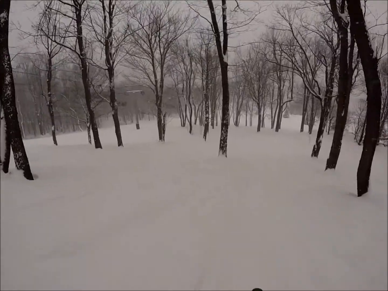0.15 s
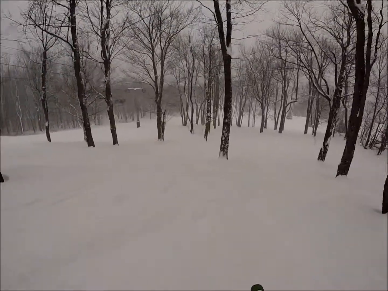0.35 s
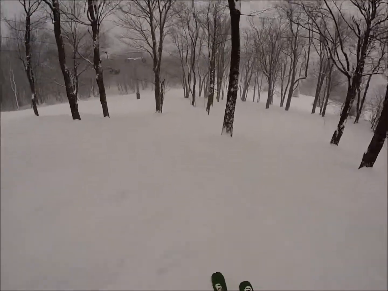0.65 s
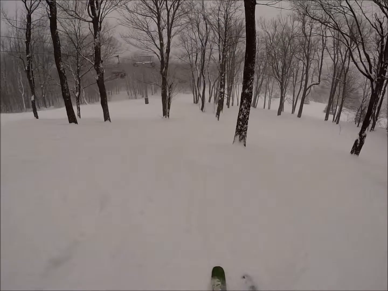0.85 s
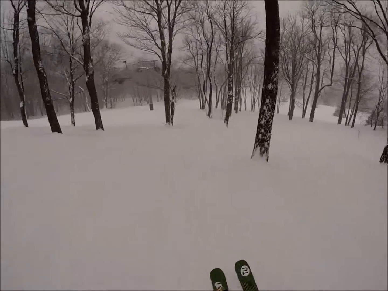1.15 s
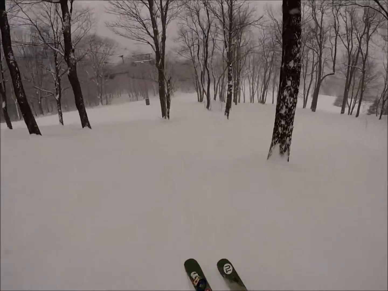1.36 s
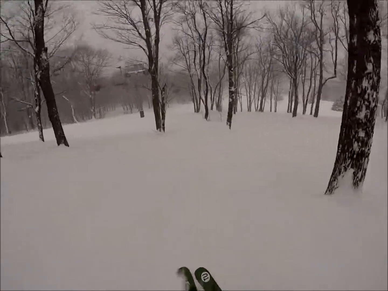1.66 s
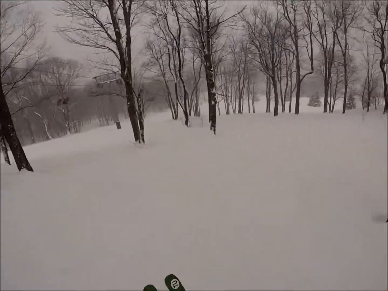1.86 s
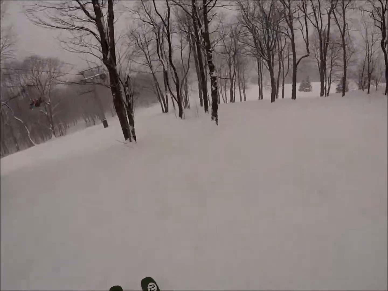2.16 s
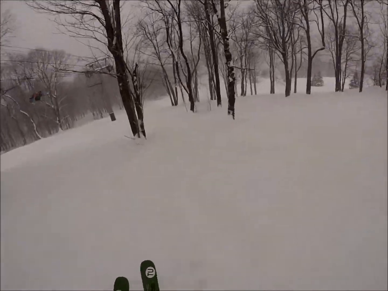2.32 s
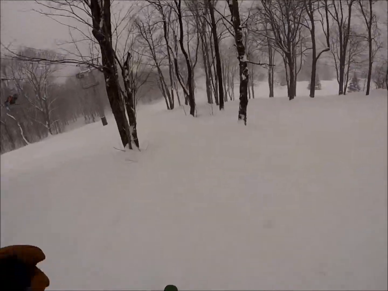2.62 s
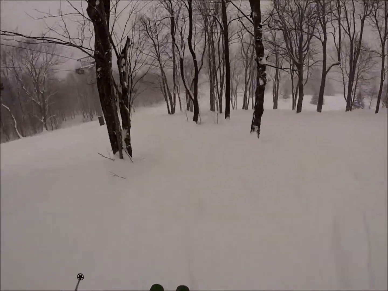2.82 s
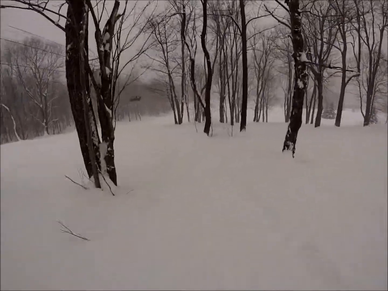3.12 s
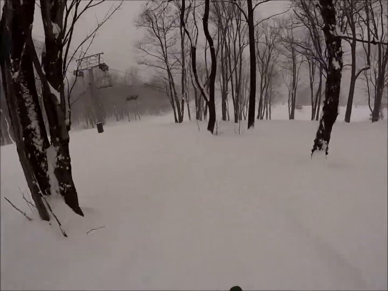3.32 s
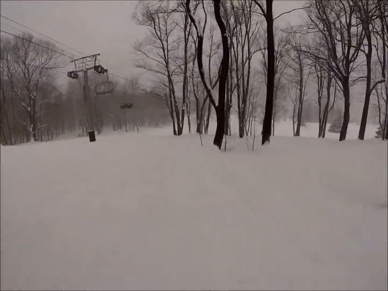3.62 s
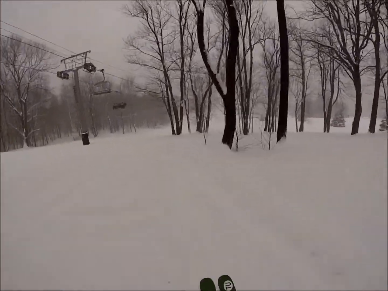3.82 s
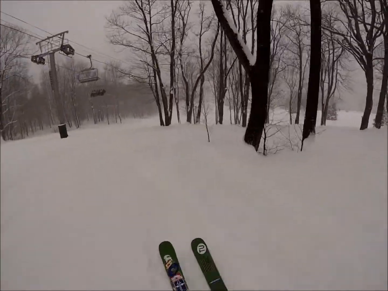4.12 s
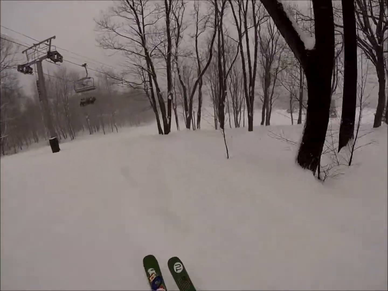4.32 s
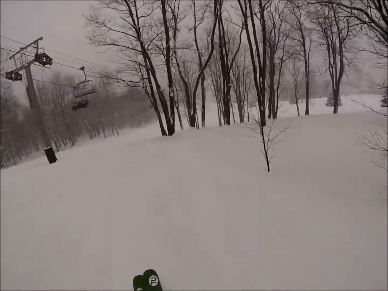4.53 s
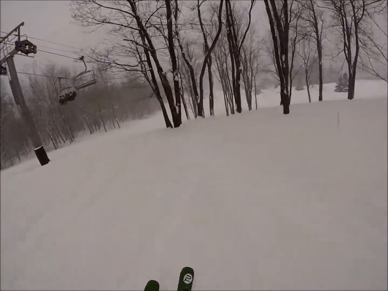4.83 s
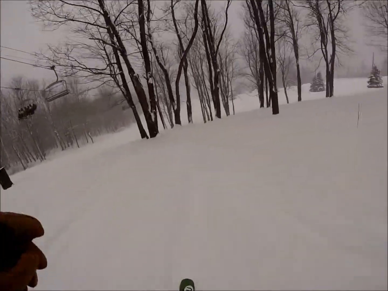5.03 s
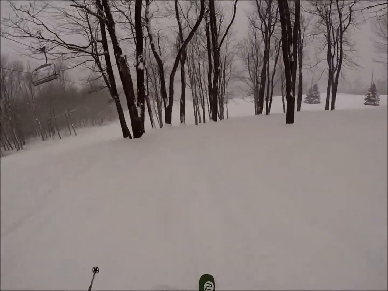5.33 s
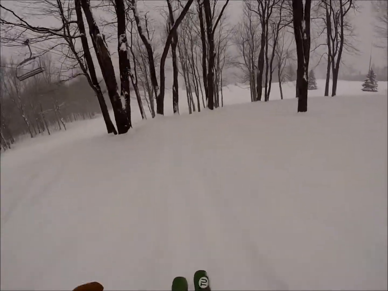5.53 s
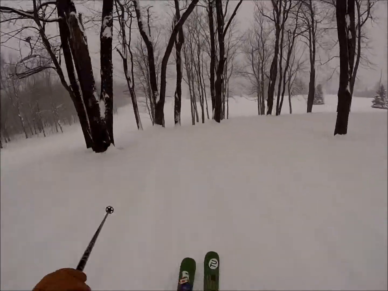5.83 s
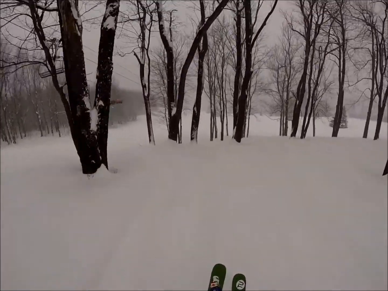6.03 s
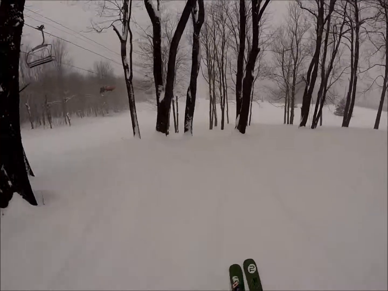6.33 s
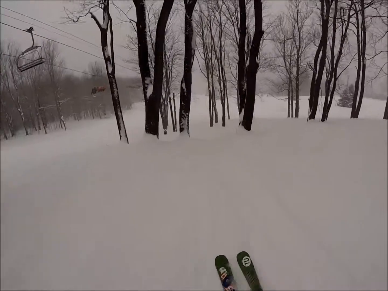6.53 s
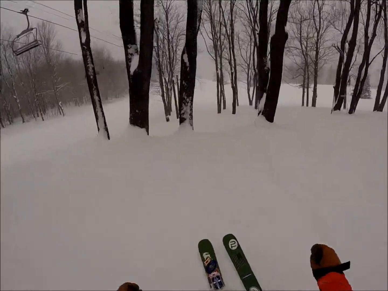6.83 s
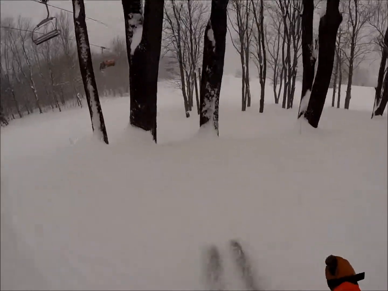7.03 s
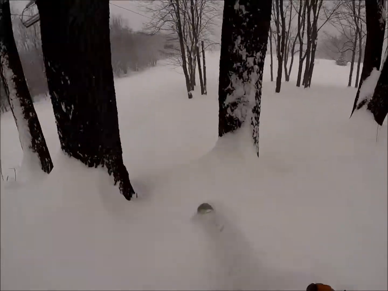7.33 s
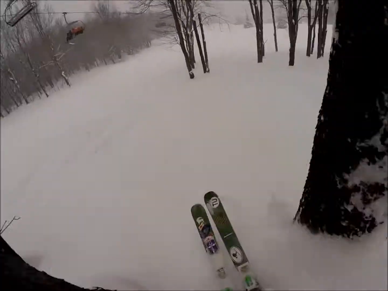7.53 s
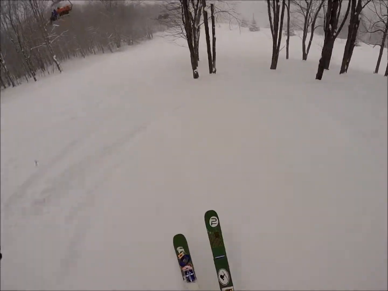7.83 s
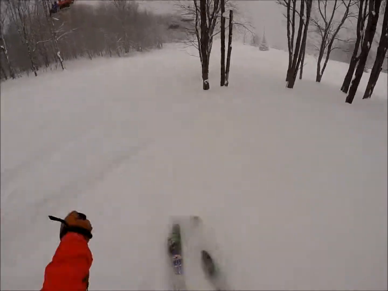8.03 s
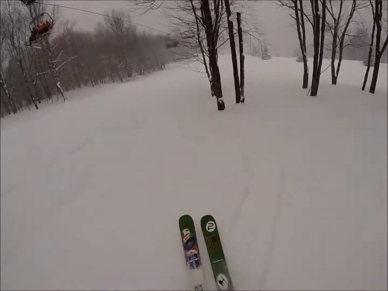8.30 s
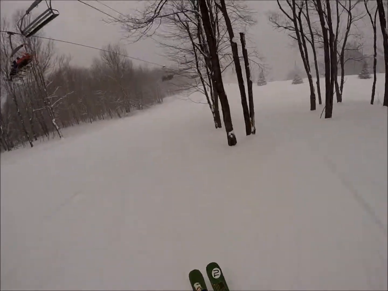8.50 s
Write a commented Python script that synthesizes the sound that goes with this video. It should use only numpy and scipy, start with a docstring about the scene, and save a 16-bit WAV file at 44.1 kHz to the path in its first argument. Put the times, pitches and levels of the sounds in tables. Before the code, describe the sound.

Heard from a camera in a plastic housing worn by a skier among trees. It begins quietly, then skis hiss and flutter through deep powder. Fine spray fizzes and crunches, and icy grains tick sharply against the casing. Dull soft thuds mark bumps. Low wind rumbles in lumps, and after a sudden brief thinning of the spray near the end, the skis and rushing air grow strongest.

```python
"""Deep powder between trees: skis run through it, heard from a camera in a plastic housing on the skier.
The snow hisses under the skis as shaped noise, with dull thuds at soft bumps. Spray is noise and
random short crunches; larger grains tick on the housing as single blows through its ring.
The headwind is low noise in slow pushes and lumps, hardest in a fast stretch near the end."""
import sys
import numpy as np
from scipy import signal
from scipy.fft import rfft, irfft
from scipy.io import wavfile
from scipy.ndimage import uniform_filter1d

SR = 44100
rng = np.random.default_rng(int(sys.argv[2]) if len(sys.argv) > 2 else 0)


def file_out(sig):
    """Save sig as 16-bit WAV at sys.argv[1]."""
    # one column per channel
    cols = np.atleast_2d(sig).T
    # limit, then scale
    lim = np.clip(cols, -1, 1)
    pcm = np.round(lim * 32767).astype(np.int16)
    wavfile.write(sys.argv[1], SR, pcm)


N = 381906  # samples, about 8.7 s
TOP_HZ = 15400  # top of the camera's treble

# How hard the skis work the snow, turn by turn; also sets the level of the heavier grains
# in the spray: start_s, effort_db
EFFORT = [(0.0, -51.5), (0.14, -53), (0.31, -44), (0.43, -49.5), (0.53, -54), (0.63, -42), (.72, -39.5),
          (.9, -37.5), (1.4, -34.5), (1.7, -36), (2.17, -35.5), (2.26, -39), (2.6, -37.5), (2.95, -38.5),
          (3.3, -35), (3.5, -33), (3.61, -38.5), (3.69, -32), (4.18, -33.5), (4.33, -37.5), (4.45, -35.5),
          (4.72, -34.5), (4.92, -37.5), (5.2, -39.5), (5.4, -38.5), (6.05, -40), (6.27, -34), (6.48, -36),
          (6.58, -40), (6.8, -32), (7.32, -29.5), (7.47, -34), (7.56, -38.5), (7.64, -34), (7.98, -29.5),
          (8.38, -36), (8.49, -31), (8.66, -32)]
# Low rub of the ski bases against the hiss, before the mix trim: start_s, level_db
RUB_LEVEL = [(0, -12.5), (.4, -18), (1.35, -15.5), (2.5, -6.5), (3.4, -8), (4.0, -12), (4.4, -9),
             (5.7, -8.5), (6.2, -15.5), (8.66, -16)]
# Spectrum of snow shearing under the skis: pitch_hz, level_db
HISS_SPECTRUM = [(350, -19), (750, -19), (1250, -10.5), (1450, -2.5), (1580, 3), (1900, 1.5), (2060, 2.5),
                 (2550, 1), (2950, -13), (3200, -8.5), (3700, -21.5), (5500, -14), (8000, -33),
                 (15000, -71)]
# Spectrum of the rubbing ski bases: pitch_hz, level_db
RUB_SPECTRUM = [(200, -12), (450, -19), (760, -19.5), (900, -2), (1000, 1), (1100, 3), (1220, -14.5),
                (1600, -40)]


def skis():
    """Countless crystals shear under the skis; the uneven snow makes the hiss flutter."""
    effort = undb(curve(EFFORT))
    rub_level = effort * undb(curve(RUB_LEVEL))
    hiss = undb(0.42) * effort * noise(HISS_SPECTRUM)
    rub = undb(-1.5) * rub_level * noise(RUB_SPECTRUM)
    flutter = undb(1.1 * walk(rate=45))
    return (hiss + rub) * flutter


# Soft bumps that the skis press through: peak_s, level_db, half_s (half length)
BUMPS = [(.44, -46.5, 0.054), (1, -40, 0.056), (2.19, -41.5, 0.053), (3.05, -40.5, .04), (3.65, -36, 0.071),
         (4.103, -38, .06), (4.902, -40.5, 0.041), (5.213, -34.5, 0.042), (6.19, -39.5, 0.049),
         (6.726, -37, 0.045), (8.14, -34, 0.05), (8.358, -35, 0.064), (8.586, -34, 0.058)]
# Spectrum of packing snow: pitch_hz, level_db
THUD_SPECTRUM = [(50, -17), (95, 7), (135, -2), (175, -14.5), (260, -18.5), (500, -34.5)]


def bumps():
    """Dull thuds that swell and fade as the skis pack the snow of a bump."""
    level = sum(undb(db) * swell(s, half_s) for s, db, half_s in BUMPS)
    return level * eddies(THUD_SPECTRUM, size=SR // 12)


# Fine snow hanging in the air, before the trim of each layer: start_s, level_db
FINE_SNOW = [(0, -55), (.9, -53.5), (1.5, -49.5), (3.0, -48.5), (4.5, -48.5), (5.5, -50.5), (6.3, -49.5),
             (7.3, -50.5), (8.66, -49)]
# Clouds of snow thrown up at the housing: peak_s, rise_db, half_s (half length)
FLURRIES = [(.42, 2, .06), (.65, 1.5, .04), (1.04, 2, .04), (1.75, 2, .2), (2.85, 4, .12), (3.42, 2.5, .12),
            (3.8, 2, .07), (4.2, 2, .08), (5.15, 2, .3), (5.62, 2.5, 0.04004)]
# The skis go light and the spray thins: peak_s, dip_db, half_s (half length)
LULLS = [(.16, -5.5, .035), (.53, -2.5, .035), (2.24, -4, .035), (3.61, -8, .045), (5.87, -3.5, .09),
         (7.585, -13, .062)]
# Spectrum of the hissing powder: pitch_hz, level_db
POWDER_SPECTRUM = [(2000, -10), (4400, -3), (5400, 3), (6800, 2), (7900, -3), (9800, -2), (12300, -7),
                   (15300, -13)]
# Spectrum that fine crystals ring with: pitch_hz, level_db
CRYSTAL_SPECTRUM = [(1000, -5.5), (3000, 3), (4400, 6.5), (5200, 0), (6500, 5), (7900, -4.5), (9400, 0.5),
                    (10700, -3), (11800, -3), (13600, -9), (15000, -10.5)]
# Ring of the housing under heavier grains: pitch_hz, level_db
GRAIN_SPECTRUM = [(500, -9), (1100, 4.5), (2200, 3), (2900, 4), (3200, 7.5), (3700, -2), (4500, -0.5),
                  (4850, 6.5), (5000, 2.5), (5250, 8.5), (5800, 1), (6600, -5.5), (7300, -2), (15000, -4.5)]


def spray():
    """Snow flies in flurries: powder hisses, fine crystals fizz, grains that grow with effort tick."""
    cruise_db = -36
    above_cruise_db = curve(EFFORT) - cruise_db
    fine = undb(curve(FINE_SNOW))
    # heavier grains gain 0.42 dB per dB of effort; their base level is before the mix trim
    heavy = undb(-43.5 + 0.42 * above_cruise_db)
    clouds_db = swells(FLURRIES) + swells(LULLS)
    flurry = undb(clouds_db + 1.6 * walk(rate=45))
    powder = undb(-6) * fine * flurry * noise(POWDER_SPECTRUM)
    crystals = impacts(fine * flurry, rate=950, spread_db=8.0, largest=2.63,
                       pitch_hz=10440, scatter=0.308, decay_cycles=3.4, ragged=0.15)
    grains = impacts(heavy * flurry, rate=230, spread_db=7.0, largest=1.5,
                     pitch_hz=4950, scatter=0.15, decay_cycles=1.2, ragged=0.056)
    fizz = undb(3) * colour(crystals, CRYSTAL_SPECTRUM)
    ticks = undb(-2.5) * colour(grains, GRAIN_SPECTRUM)
    return powder + fizz + ticks


def impacts(flow, rate, spread_db, largest, pitch_hz, scatter, decay_cycles, ragged, size=64):
    """Grains of rms `flow`, each a brief crunch at its own pitch; sizes stop at `largest` deviations."""
    # more snow means mostly more grains, and somewhat louder ones
    density = (flow / flow.mean()) ** .95
    at = np.flatnonzero(rng.random(N) < rate * density / SR)  # rate in grains per second
    chance = rng.standard_normal((len(at), size + 3))
    weight, pitch, phase = chance.T[:3, :, None]
    grain_hz = np.minimum(pitch_hz * np.exp(scatter * pitch), TOP_HZ)
    cycles = grain_hz * np.arange(size) / SR
    # a grain crumbles unevenly, so each has its own ragged colour
    crumble = ragged * np.cumsum(chance[:, 3:], axis=1)
    crunch = np.exp(-cycles / decay_cycles) * np.sin(2 * np.pi * (cycles + phase + crumble))
    crunch /= np.linalg.norm(crunch, axis=1, keepdims=True)
    crunch *= undb(spread_db * np.minimum(weight, largest))
    samples = at[:, None] + np.arange(size)
    x = np.bincount(samples.ravel(), crunch.ravel(), N + size)[:N]
    x = x / np.sqrt(density)
    return flow * x / x.std()


# Larger icy grains striking the housing, levels before the trim of each part:
# start_s (just before the blow), tick_db, knock_db (against the tick), splinter_db (against the tick)
PELLETS = [(0.243, -25.5, -22, -30), (0.3025, -39, 12, -15), (0.329, -25, -18, -21), (0.348, -26, -16, -8),
           (0.397, -28, -14, -11), (0.5332, -30, -16, -16), (0.5906, -34, 6, -16), (0.608, -29, -11, -13),
           (0.635, -15.5, -23, -30), (0.6484, -15.5, -24, -18), (0.8748, -12, -26, -29),
           (0.9971, -21, -16, -25), (1.0526, -25.5, -12, -4), (1.2107, -21, -18, -15),
           (1.3773, -18, -14, -15), (1.4453, -19, 3.5, -13), (1.7561, -17, -12, -21),
           (1.817, -20.5, -5, -16), (1.869, -19.5, -16, -24), (2.047, -18, -16, -25),
           (2.336, -12.5, -20, -18), (2.3656, -17, -21, -30), (2.455, -19, -10, -24), (2.832, -18, -8, -16),
           (2.963, -18, -19, -15), (3.1448, -20, -13, -18), (3.2164, -6.5, -6.5, -28),
           (3.5085, -16, -8, -25), (3.7134, -17, -15, -24), (3.7265, -18, -10, -21),
           (3.7468, -17, -13, -19), (3.7754, -18.5, -17, -16), (4.0006, -15.5, -6, -28),
           (4.0135, -16.5, -3, -26), (4.0899, -9, -21, -29), (4.1683, -18, -9, -22),
           (4.1873, -17, -15, -22.5), (4.2098, -26, -18, -27), (4.2524, -19, -10, -22),
           (4.3515, -16.5, -22, -13), (4.4647, -20.5, -11, -29), (4.554, -14.5, -17, -17),
           (4.6616, -18.5, -17, -20), (4.7688, -19, -5, -25), (4.8545, -11.5, -11, -25),
           (5.1985, -17, -22, -24), (5.5829, -17, -19, -18), (5.6003, -18, -17, -23),
           (5.9714, -17.5, -12, -27), (6.1434, -17, -19, -20), (6.3628, -17, -21, -22),
           (6.421, -18.5, -18, -19), (6.6594, -20, -7, -26), (6.7166, -17.5, -17, -19),
           (6.7985, -15.5, -17, -21), (7.1813, -17, -14, -24), (7.203, -15, -16, -23.5),
           (7.9733, -24, -14, -26), (8.0987, -19, -10, -27), (8.461, -23, 6.5, -20)]
# Spectrum of the housing's tick: pitch_hz, level_db
TICK_SPECTRUM = [(800, -23), (2200, -11), (3500, -10.5), (4500, -2.5), (5250, 1.5), (5800, -5.5),
                 (6700, -13), (7400, -23.5), (15000, -38)]
# Spectrum of a heavy grain's dull knock: pitch_hz, level_db
KNOCK_SPECTRUM = [(500, -51), (1400, -31), (2100, 8), (2850, 2.5), (3250, 2), (4200, -8), (6600, -16),
                  (15000, -50)]
# Spectrum of a brittle grain's bright splinter: pitch_hz, level_db
SPLINTER_SPECTRUM = [(3000, -52), (6500, -17), (8000, 13), (9400, 17.5), (10700, 10.5), (12000, 14),
                     (15000, -24)]


def pellets():
    """Single icy grains: a millisecond tick of the housing; heavy ones knock, brittle ones splinter."""
    s, db, knock_db, splinter_db = np.transpose(PELLETS)
    lead_s = 0.001078  # short wait from the row's time to the blow
    longest_collapse_s = 0.0006
    tick_trim_db, knock_trim_db, splinter_trim_db = 1.75, 0.5, 6.5
    hit_s = s + lead_s
    # a grain hits, then collapses under a millisecond later
    collapse_s = hit_s + longest_collapse_s * rng.uniform(.3, 1, len(s))
    shards_db = db + splinter_db + splinter_trim_db
    tick = strike(hit_s, db + tick_trim_db, TICK_SPECTRUM)
    first_splinter = strike(hit_s, shards_db, SPLINTER_SPECTRUM)
    second_splinter = strike(collapse_s, shards_db + 1, SPLINTER_SPECTRUM)
    knock = strike(collapse_s, db + knock_db + knock_trim_db, KNOCK_SPECTRUM)
    return tick + first_splinter + second_splinter + knock


def strike(s, db, spectrum):
    """Blows at the given times and peak levels, ringing with a spectrum."""
    blows = np.bincount((s * SR).astype(int), undb(db), N)
    return colour(blows, spectrum) / np.abs(ring(spectrum)).max()


# Headwind that grows with speed, the base of all its layers but the rush: start_s, level_db
HEADWIND = [(0, -48.5), (.8, -48), (1.05, -44.5), (2.3, -42.5), (2.6, -45), (3.8, -42), (4.6, -44),
            (5.4, -43), (6.0, -43.5), (7.45, -39.5), (7.8, -32), (8.25, -36.5), (8.4, -39), (8.66, -43)]
# Gusts that buffet the housing: peak_s, level_db, half_s (half length)
GUSTS = [(0.642, -37, 0.056), (1.788, -32, 0.068), (2.15, -31, 0.11), (2.433, -33.5, 0.08),
         (2.655, -33, 0.049), (2.847, -31.5, 0.045), (3.5, -34.5, .05), (3.88, -36, 0.056),
         (4.198, -32.5, .12), (5.08, -23, 0.044), (5.453, -38, 0.23), (7.19, -28, 0.14),
         (7.542, -25.5, 0.19), (7.83, -36, 0.052), (8.157, -22, 0.16)]
# Smooth rush of air at speed: start_s, level_db
RUSH = [(0, -82), (1.0, -63), (6.0, -62), (6.3, -53), (6.7, -48), (7.55, -61), (7.68, -44), (8.0, -40),
        (8.2, -45), (8.35, -42.5), (8.66, -47.5)]
# Spectrum of the slow push of big eddies: pitch_hz, level_db
SWAY_SPECTRUM = [(2, -29), (7, -3.5), (13, -0.5), (21, -7), (30, -32), (70, -51)]
# Spectrum of the buffeting: pitch_hz, level_db
BUFFET_SPECTRUM = [(10, -18), (24, -11.5), (33, 9), (46, -7.5), (60, -7.5), (130, -61)]
# Spectrum of the small eddies' rumble: pitch_hz, level_db
RUMBLE_SPECTRUM = [(25, -34), (55, -4.5), (80, 3), (105, -3), (140, -9.5), (180, -8.5), (215, -7.5),
                   (260, -16), (340, -22.5), (550, -25), (1200, -31.5), (4000, -84)]
# Spectrum of the rushing air: pitch_hz, level_db
AIR_SPECTRUM = [(150, 4), (220, 21), (280, 13), (350, 0), (520, 2.5), (750, -1), (1000, 8.5), (3000, 6),
                (4200, -22), (5500, 11), (6500, 4.5), (7300, 7.5), (8000, -6), (12000, -9), (15000, -14)]


def wind():
    """Big eddies push slowly on the housing, small ones rumble in lumps, and at speed the air rushes."""
    steady = undb(curve(HEADWIND))
    gusts = sum(undb(db) * swell(s, half_s) for s, db, half_s in GUSTS)
    # steady wind and gusts add as powers, in a different balance for each layer
    sway_level = np.hypot(steady * undb(12.5), gusts * undb(2.5)) * undb(2.2 * walk(rate=8.9))
    buffet_level = np.hypot(steady * undb(-1.5), gusts)
    rumble_level = np.hypot(steady, gusts * undb(-19)) * undb(1.66 * walk(rate=24))
    sway = sway_level * eddies(SWAY_SPECTRUM, size=SR // 5)
    buffet = buffet_level * eddies(BUFFET_SPECTRUM, size=SR // 8)
    rumble = rumble_level * eddies(RUMBLE_SPECTRUM, size=SR // 8)
    rush = undb(curve(RUSH)) * noise(AIR_SPECTRUM)
    return sway + buffet + rumble + rush


def eddies(spectrum, size):
    """Turbulence whose strength holds even over `size` samples."""
    x = noise(spectrum)
    return x / np.sqrt(uniform_filter1d(x ** 2, size=size))


def undb(db):
    """Decibels to gain."""
    return 10 ** (np.asarray(db) / 20)


def ring(spectrum, size=32768):
    """Causal impulse response of unit energy with the given spectrum, falling away above its last point."""
    hz, db = np.transpose(spectrum)
    f = np.maximum(np.fft.rfftfreq(size, 1 / SR), 1)
    gain = undb(np.interp(np.log(f), np.log(hz), db))
    gain = gain * np.minimum(hz[-1] / f, 1) ** 2
    # folding the cepstrum gives minimum phase: the ring starts at once
    cepstrum = irfft(np.log(gain))
    cepstrum[1:size // 2] *= 2
    cepstrum[size // 2 + 1:] = 0
    fade = signal.windows.hann(2 * size)[size:]
    response = irfft(np.exp(rfft(cepstrum))) * fade
    return response / np.linalg.norm(response)


def colour(x, spectrum):
    """Let an excitation ring with a spectrum."""
    return signal.fftconvolve(x, ring(spectrum))[:N]


def noise(spectrum):
    """Steady noise of rms about 1 with a spectrum."""
    response = ring(spectrum)
    white = rng.standard_normal(N + len(response) - 1)
    return signal.fftconvolve(white, response, "valid")


def walk(rate):
    """Random levels around 0, held 1 / rate seconds and smoothed twice over that time."""
    k = max(int(SR / rate), 1)
    held = np.repeat(rng.standard_normal(N // k + 1), k)
    smooth = uniform_filter1d(uniform_filter1d(held, k), k)
    return 1.3 * smooth[:N]  # makes up for spread lost in smoothing


def curve(table):
    """Straight lines through (start_s, value) points."""
    return np.interp(np.arange(N) / SR, *np.transpose(table))


def swell(s, half_s):
    """A bell that rises to 1 at time s and falls again, to 1/e after half_s."""
    return np.exp(-((np.arange(N) / SR - s) / half_s) ** 2)


def swells(table):
    """Sum of bells from rows of (peak_s, height, half_s)."""
    return sum(height * swell(s, half_s) for s, height, half_s in table)


def scene():
    """Skis, flying snow and wind at one microphone."""
    return (skis() + bumps() + spray() + pellets() + wind())[None]


def record(dry):
    """The camera cuts the top of the treble with a steep low-pass."""
    low_pass = signal.ellip(8, .2, 70, TOP_HZ, fs=SR, output="sos")
    return signal.sosfilt(low_pass, dry)


dry = scene()
out = record(dry)
file_out(out)
```